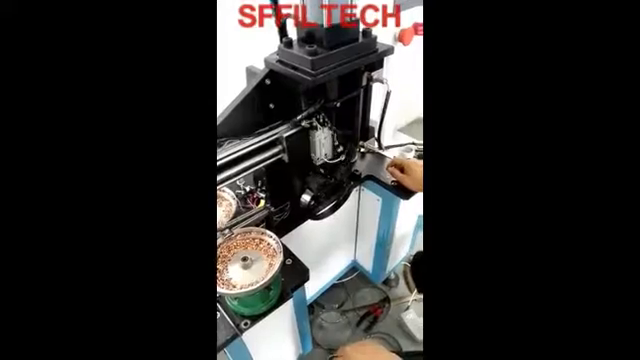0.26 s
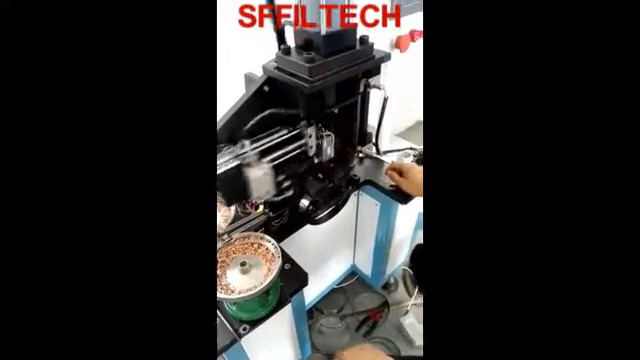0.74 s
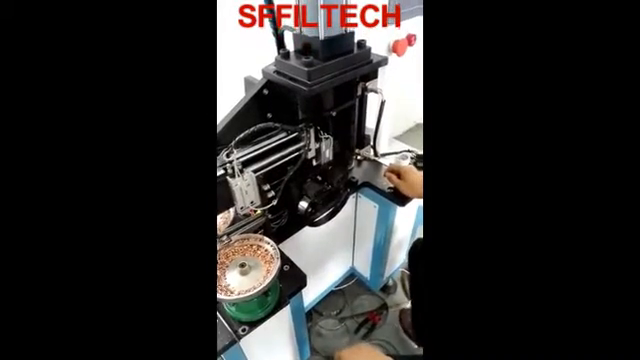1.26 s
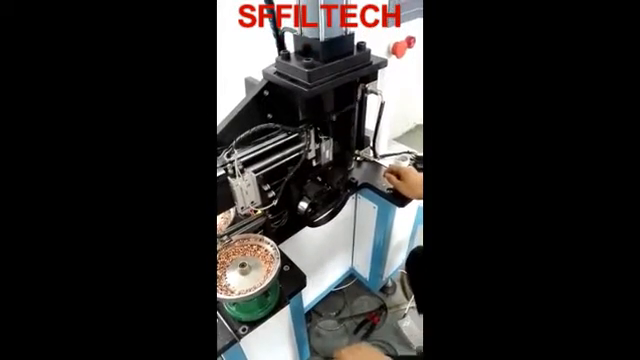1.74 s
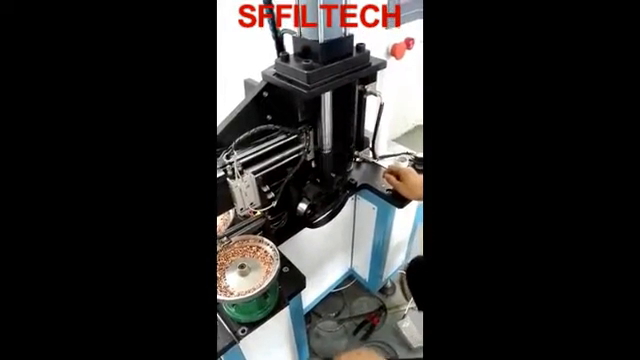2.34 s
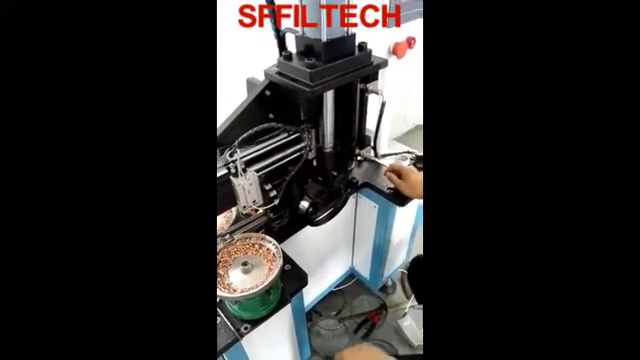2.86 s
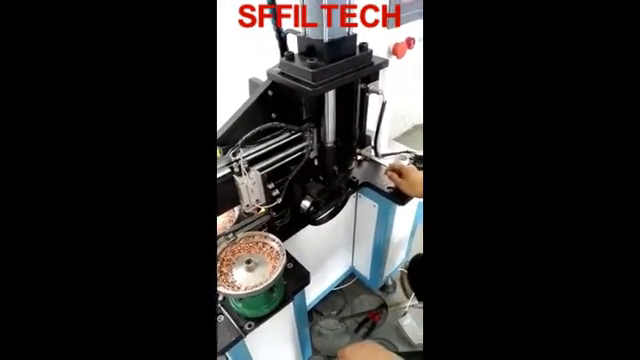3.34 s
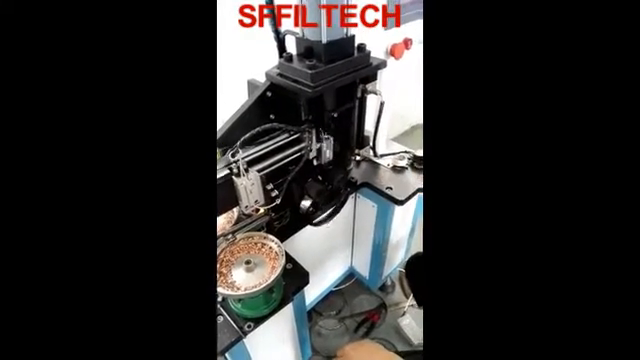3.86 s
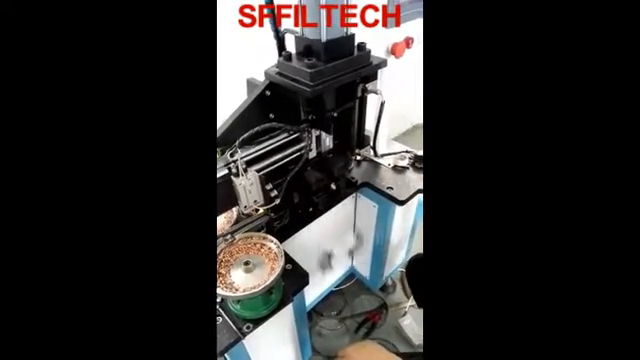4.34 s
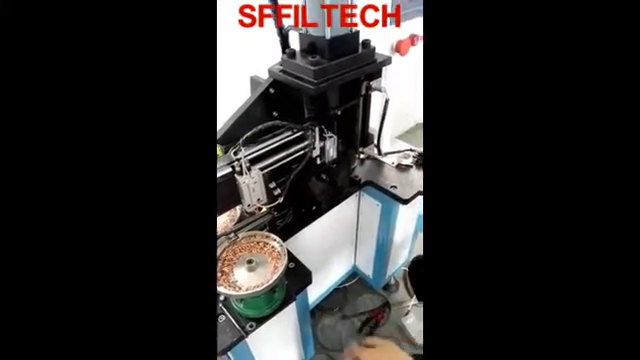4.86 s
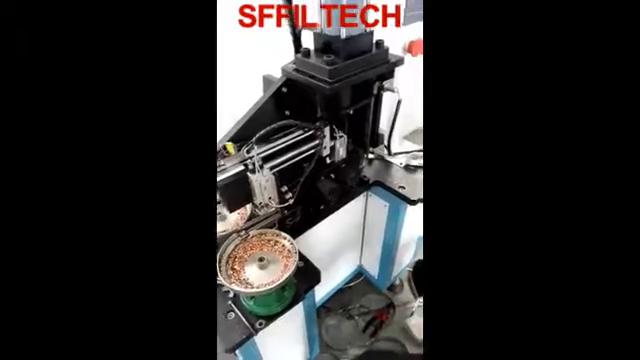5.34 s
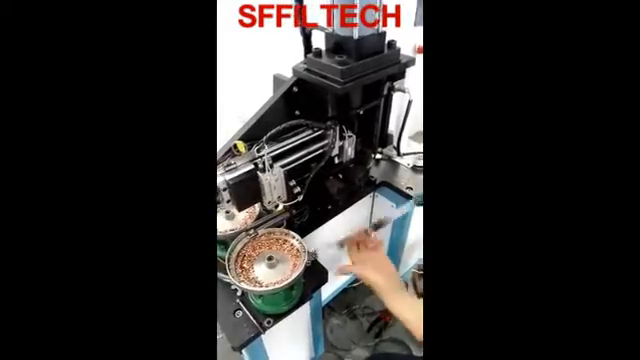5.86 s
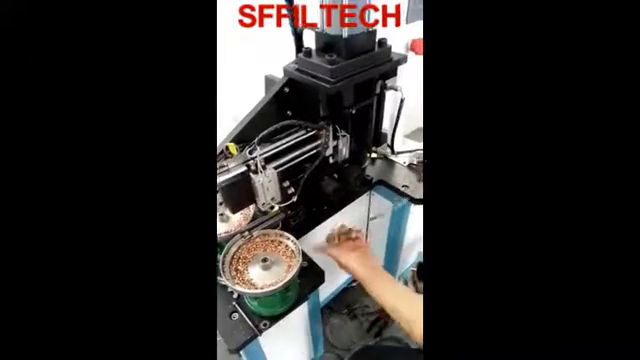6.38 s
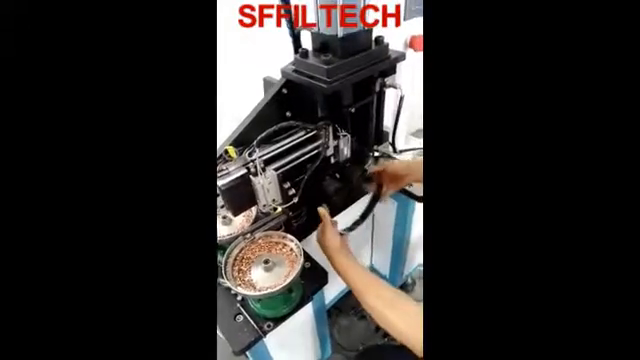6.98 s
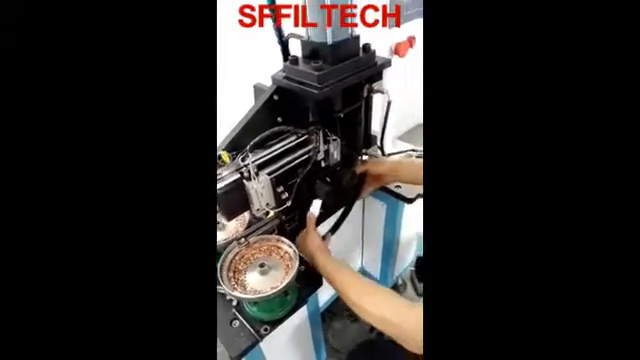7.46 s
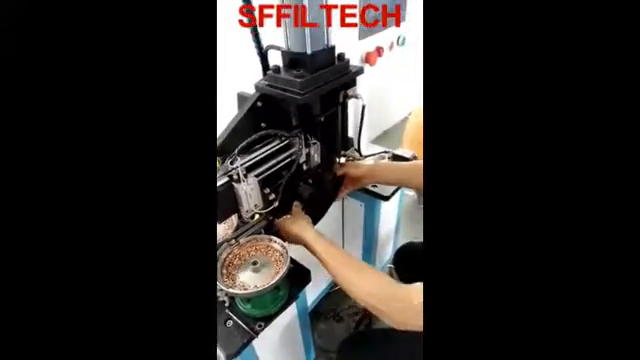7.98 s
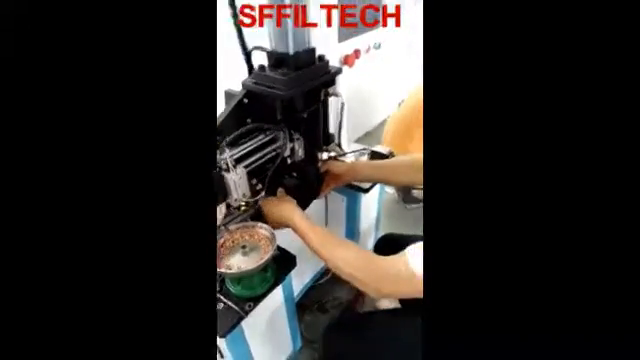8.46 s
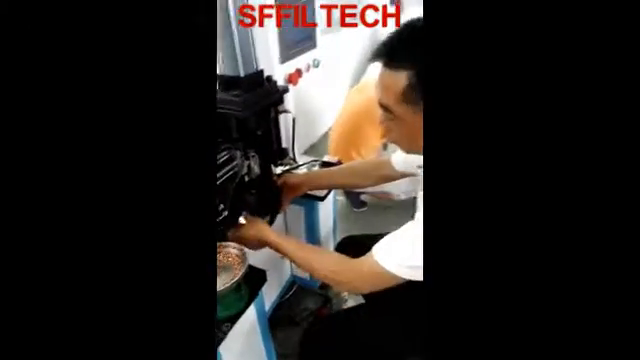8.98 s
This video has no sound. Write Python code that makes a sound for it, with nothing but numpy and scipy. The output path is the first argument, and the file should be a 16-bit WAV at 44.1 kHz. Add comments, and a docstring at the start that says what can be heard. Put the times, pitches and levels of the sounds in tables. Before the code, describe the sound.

In a hard-walled workshop, machines drone and hiss while a pneumatic press starts its cycle with a puff, a rubbing slide and steel clacks. Air hisses, then the ram lands with a sharp crack and a low boom. Two loud air blasts lead into a run of weaker ones, mixed with clinking parts and a faint feeder ring. A few more clacks and blasts follow. Heard close, from a handheld phone.

```python
"""A pneumatic press in a workshop

The press runs one cycle, heard from a phone held above it. A slide rubs along, air hisses as the ram
comes down, and the tool cracks onto the die and makes the frame boom. Then a valve lets out short
blasts of air and loose metal parts clink. Machines drone behind; hard walls give each blast a tail."""
import sys
import numpy as np
from scipy import signal
from scipy.fft import rfft, irfft
from scipy.io import wavfile

SR = 44100
rng = np.random.default_rng(int(sys.argv[2]) if len(sys.argv) > 2 else 0)


def generate_wav(sig):
    """Save sig (samples, or channels by samples) to the path in sys.argv[1] as 16-bit PCM at SR."""
    pcm = np.round(np.clip(np.atleast_2d(sig).T, -1, 1) * 32767).astype(np.int16)
    wavfile.write(sys.argv[1], SR, pcm)


N = 406602
TIME = np.arange(N) / SR
FREQ = np.arange(N // 2 + 1) * SR / N + 1e-3
MIC_GAP_M, SOUND_M_PER_S = 0.2, 343  # the phone has two microphones, left and right
MIC_LAG = round(MIC_GAP_M / SOUND_M_PER_S * SR)  # in samples


# Short blasts of air. Each row: start in seconds, level in dB, seconds the valve is open,
# extra hollow body in dB, extra high sizzle in dB.
AIR_BLASTS = [(3.318, -6, .015, 1, 2.5), (3.707, -8, 0.0059, -1, -.5), (4.086, -17.5, 0.027, 1, 2.5),
              (4.423, -18, 0.025, -0.5, 0), (4.705, -21, 0.021, 1.5, 7), (4.987, -19.5, 0.025, -3.5, -5),
              (5.253, -22, 0.026, 0, -0.5), (5.511, -21, 0.023, 0.5, -.5), (5.785, -21, 0.024, -1.5, -3.5),
              (6.053, -16, 0.019, -3, -4), (6.271, -19, 0.037, -8.5, 6), (6.312, -22, 0.038, -4, -6),
              (6.528, -22.5, 0.018, -2, -2.5), (7.477, -13, 0.025, 3.5, 0), (8.004, -15.5, .032, 4.5, -0.5)]
# The tone of the rushing air. Each row: frequency in Hz, level in dB.
JET_TONE = [(40, -29), (130, -18.5), (280, -11), (480, -11.5), (700, -16), (950, -1.5), (1250, -5.5),
            (1550, -1), (2300, 0), (3300, 0), (4400, 1.5), (7000, -3.5), (10500, -10.5), (14500, -14.5)]
# Hollows and plates that the air sets ringing. Each row: pitch in Hz, boost in dB.
CAVITY_RINGS = [(175, 5), (272, 5), (345, 1), (960, 3), (1535, 4), (1684, 4), (1915, 4), (2052, 4),
                (2533, 5), (2606, 3), (2881, 3), (2932, 3), (3731, 3), (3855, 3), (4268, 5), (4377, 6),
                (4831, 2), (5647, 4)]

def air_blasts(flutter_db=0.96, rise=0.0014, fade=0.027):
    """Each time the valve opens it spits, then a swirling jet of air rings the hollows of the machine."""
    rings = 1 + sum((undb(db) - 1) * resonance(hz, width=68) ** 2 for hz, db in CAVITY_RINGS)
    jet = rfft(noise(undb(curve(JET_TONE)) * rings) * undb(flutter_db * wobble(300)))
    # Split the jet into low body, a bark near 2 kHz, high sizzle and the rest.
    shares = [curve([(1000, 1), (1600, 0)]),
              curve([(1000, 0), (1600, 1), (2300, 1), (3400, 0)]),
              curve([(5500, 0), (10000, 1)])]
    body, bark, sizzle, rest = (irfft(jet * share, N) for share in shares + [1 - sum(shares)])
    out = np.zeros((2, N))
    for start, db, hold, hollow_db, sizzle_db in AIR_BLASTS:
        bark_db = 1.4 + 0.7 * hollow_db  # hollow blasts bark more
        air = puff(start, rise, hold, fade) * (undb(hollow_db) * body + undb(bark_db) * bark + rest)
        spit = puff(start, rise, hold, fade, surge=1.2, surge_s=0.006) * undb(sizzle_db) * sizzle
        out += pan(-0.11 * hollow_db) * undb(db) * (air + spit)  # and lie further right
    return out


# Air escaping from the cylinders. Each row: start in seconds, level in dB, seconds open,
# fade in seconds, extra sizzle in dB.
AIR_HISSES = [(0, -22.5, .05, 0.013, 4), (1.768, -24.5, 0.075, 0.059, 0.5), (1.93, -42, 0.54, .09, 10.5),
              (2.837, -34.5, 0.024, 0.033, -15), (4.935, -31.5, 0.093, 0.039, 12.5),
              (5.12, -44, 0.23, 0.056, 14.5), (7.094, -29.5, 0.025, 0.037, -7),
              (7.189, -26, 0.017, 0.059, -3.5), (8.730, -34.5, .008, 0.065, -13)]
# The tone of that hiss. Each row: frequency in Hz, level in dB.
HISS_TONE = [(100, -7.5), (1000, -4), (2100, 3.5), (3000, 0.5), (4200, 4.5), (7000, -2), (11000, -4),
             (14500, -7)]

def air_hisses(flutter_db=2.3):
    """Air squeezes through narrow openings and hisses for as long as a piston moves."""
    jet = rfft(noise(undb(curve(HISS_TONE))) * undb(flutter_db * wobble(60)))
    high_share = curve([(6000, 0), (10000, 1)])
    hiss, sizzle = irfft(jet * (1 - high_share), N), irfft(jet * high_share, N)
    return sum(undb(db) * puff(start, 0.0012, hold, fade) * (hiss + undb(sizzle_db) * sizzle)
               for start, db, hold, fade, sizzle_db in AIR_HISSES)


RAM_LANDS_S = 2.333
# How the die, the block under the tool, rings. Each row: pitch in Hz, width in Hz, level in dB.
DIE_RINGS = [(600, 900, -6.5), (1750, 560, 1.5), (2440, 430, -0.5), (4130, 520, -0.5), (5040, 2500, -3.5),
             (12100, 7100, -10)]

def ram_crack(level_db=-5, lead_s=0.0058):
    """The tool hits the die, which rings for a few milliseconds just before the frame swings."""
    loudness = burst(RAM_LANDS_S - lead_s, rise=0.00093, hold=0.0038, fade=0.0015)
    return undb(level_db) * loudness * ringing_noise(DIE_RINGS)


# The low notes of the frame. Each row: pitch in Hz, level in dB, fade in seconds.
FRAME_NOTES = [(121, -36.5, 0.15), (136, -33.5, 0.079), (166.6, -43, 0.13), (209, -39, 0.16)]

def ram_boom():
    """The landing ram sets the frame swinging; its low notes throb against each other as they fade."""
    return knocks([(RAM_LANDS_S, db, fade, hz) for hz, db, fade in FRAME_NOTES], rise=0.002, hold=0.0045)


# Steel hitting steel. Each row: start in seconds, level in dB, fade in seconds,
# added brightness in dB per octave above 1 kHz.
STEEL_HITS = [(.378, -31, .0087, 4), (.987, -21.5, 0.015, -4.5), (4.247, -25, .0074, 4.5),
              (4.969, -18, 0.0054, 0.5), (7.115, -15.5, 0.025, 2.5), (7.356, -32.5, .02, .5),
              (8.761, -31, .022, 1)]
# The tone of the steel. Each row: frequency in Hz, level in dB.
STEEL_TONE = [(100, -16), (500, -8), (1100, 8.5), (1800, 2), (2400, 6), (3500, 1), (4600, 4), (7000, -3.5),
              (11000, -12.5), (14500, -13)]

def steel_clacks(rise=0.00096, hold=0.0044):
    """Steel parts meet and ring briefly at so many pitches that they blur into noise."""
    steel_db = curve(STEEL_TONE)
    octaves = np.log2(np.maximum(FREQ / 1000, 1))
    return sum(undb(db) * burst(start, rise, hold, fade) * noise(undb(steel_db + bright_db * octaves))
               for start, db, fade, bright_db in STEEL_HITS)


# Loose parts dropping and bouncing. Each row: start in seconds, level in dB, fade in seconds.
PART_LANDINGS = [(4.307, -27, .012), (4.335, -31.5, 0.005), (5.421, -23.5, 0.009)]
# How such a part rings. Each row: pitch in Hz, width in Hz, level in dB.
PART_RINGS = [(1016, 280, 0.5), (1290, 97, -7), (1540, 200, -2), (2100, 150, -0.5), (3500, 4100, -14)]

def loose_parts(rise=0.00081, hold=0.008):
    """A light metal part chatters for a moment each time it lands."""
    chatter = ringing_noise(PART_RINGS)
    return chatter * sum(undb(db) * burst(start, rise, hold, fade) for start, db, fade in PART_LANDINGS)


# Heavy parts coming to a stop. Each row: start in seconds, level in dB, pitch in Hz.
HEAVY_STOPS = [(.052, -28, 88.5), (.372, -28.5, 90), (1.008, -30, 129), (1.763, -25.5, 76),
               (2.336, -29, 80.6), (4.855, -35, 104), (5.42, -41, 135), (7.355, -47, 109)]

def frame_thuds(stop_fade=0.0081, kick_lag_s=0.0133, kick_db=-32.5, kick_fade=0.0085, kick_hz=66):
    """The frame thuds when a heavy part stops, and just after each blast, in step with its strength."""
    stops = [(start, db, stop_fade, hz) for start, db, hz in HEAVY_STOPS]
    kicks = [(start + kick_lag_s, db + kick_db, kick_fade, kick_hz) for start, db, *_ in AIR_BLASTS]
    return knocks(stops + kicks, rise=0.0046, hold=0.0053)


# Two clicks before the ram moves. Each row: start in seconds, level in dB.
HOLLOW_CLICKS = [(1.445, -25), (1.733, -24.5)]

def hollow_clicks(hz=990, fade=0.0025):
    """The same small hollow part knocks twice."""
    return knocks([(start, db, fade, hz) for start, db in HOLLOW_CLICKS], rise=0.0025, hold=0.006)


# Slides rubbing and the table shuddering.
# Each row: pitch in Hz, width in Hz, level in dB, start in seconds, end in seconds.
SLIDE_RUBS = [(2200, 460, -43.5, .5, .97), (200, 260, -39, 0.975, 1.073), (940, 500, -40, 2.93, 3.15),
              (150, 270, -46.5, 4.2, 4.38)]

def slide_rubs():
    """Rubbing keeps the metal ringing while a slide moves."""
    return singing(SLIDE_RUBS, rise=0.0057, fade=0.036)


# Bowls that shake parts toward the press.
# Each row: pitch in Hz, width in Hz, level in dB, start in seconds, end in seconds.
FEEDER_BOWLS = [(2420, 140, -62, 2.8, 3.3), (2535, 230, -51.5, 4.9, 8.6)]
# The tone of the nearby machines. Each row: frequency in Hz, level in dB.
DRONE_TONE = [(25, -25), (60, -5.5), (300, -5.5), (450, -8.5), (940, 0.5), (2200, -3.5), (3200, -6.5),
              (3850, -7), (4300, -10.5), (7000, -22.5), (14000, -24)]
# The tone of the hall's steady hiss. Each row: frequency in Hz, level in dB.
HALL_TONE = [(30, -20), (65, -3.5), (250, -6), (600, -7), (950, 2.5), (1400, -0.5), (2500, 2), (4000, -2),
             (6500, -3), (11000, -8.5), (14500, -9.5)]

def workshop(drone_db=-31, sag_db_per_s=1.54, quiet_db=-47, hall_db=-39):
    """Machines drone, shaking bowls sing, and the hall hisses."""
    flicker = undb(0.8 * wobble(150) + 0.3 * wobble(12))
    # The drone sinks to a quieter level from 3.24 s over 1.36 s, likely the phone turning it down.
    sinking = np.clip((TIME - 3.24) / 1.36, 0, 1)
    loud_db = drone_db - sag_db_per_s * TIME
    drone = near_and_far(undb(curve(DRONE_TONE))) * undb((1 - sinking) * loud_db + sinking * quiet_db)
    hall = near_and_far(undb(curve(HALL_TONE))) * undb(hall_db)
    bowls = singing(FEEDER_BOWLS, rise=0.077, fade=0.22)
    turning_away = undb(-2.5 * np.maximum(TIME - 7.7, 0))  # all three fade as the phone turns at 7.7 s
    return flicker * turning_away * (drone + hall + bowls)


# How long the hall rings. Each row: frequency in Hz, seconds to fade by 60 dB.
ECHO_TIMES = [(100, 0.35), (500, 0.89), (2000, 0.6), (5000, 0.66), (9000, 0.62), (14000, 0.49)]

def hall_echo(sound, direct_db=-6, early_db=-1.5, late_db=-5.5, early_s=0.0063, pieces=14):
    """Sound arrives directly, bounces off the frame (early) and rings on in the hall (late)."""
    size = N // pieces
    age = TIME[:size]
    scatter, tail = all_around(1), rfft(all_around(1))
    centres = np.transpose(ECHO_TIMES)[0]
    bands = [irfft(tail * curve(np.column_stack([centres, one_band])), N)
             for one_band in np.eye(len(centres))]
    out = np.zeros((2, N + size))
    for start in range(0, pieces * size, size):  # the hand drifts, so each piece gets new echoes
        part = slice(start, start + size)
        early = scatter[:, part] * np.exp(-age / early_s)
        late = sum(band[:, part] * undb(-60 * age / ring_s)
                   for band, (_, ring_s) in zip(bands, ECHO_TIMES))
        late *= 1 - np.exp(-age / 0.0081)  # the tail takes a moment to build
        response = sum(undb(db) * echo / np.linalg.norm(echo, axis=1, keepdims=True)
                       for echo, db in ((early, early_db), (late, late_db)))
        response[0, MIC_LAG] += undb(direct_db)
        response[1, 0] += undb(direct_db)
        out[:, start:start + 2 * size - 1] += signal.fftconvolve(sound[:, part], response, axes=1)
    return out[:, :N]


def undb(db):
    """Turn decibels into a number to multiply by."""
    return 10 ** (np.asarray(db) / 20)


def curve(points):
    """Join (Hz, value) points with lines, giving every octave the same room."""
    hz, value = np.transpose(points)
    return np.interp(np.log(FREQ), np.log(hz), value)


def resonance(hz, width):
    """How strongly a ringing thing answers each frequency: 1 at its own pitch."""
    return 1 / np.sqrt(1 + ((FREQ ** 2 - hz ** 2) / (FREQ * width)) ** 2)


def noise(tone):
    """Noise of strength 1, shaped by a gain for each frequency."""
    shaped = irfft(rfft(rng.standard_normal(N)) * tone, N)
    return shaped / shaped.std()


def ringing_noise(rings):
    """Noise gathered around the pitches at which a part rings."""
    return noise(sum(undb(db) * resonance(hz, width) ** 2 for hz, width, db in rings))


def all_around(tone):
    """Noise from all sides: left and right are alike in the bass and unrelated in the treble."""
    alike = 0.97 * np.sinc(2 * FREQ * MIC_GAP_M / SOUND_M_PER_S)
    mid, side = (rfft(rng.standard_normal(N)) * tone * np.sqrt(1 + sign * alike) for sign in (1, -1))
    stereo = irfft(np.array([mid + side, mid - side]), N)
    return stereo / stereo.std()


def near_and_far(tone, direct_db=-4):
    """Noise that comes partly straight from the machines and partly from all sides."""
    return (all_around(tone) + undb(direct_db) * from_right(noise(tone))) / np.hypot(1, undb(direct_db))


def from_right(sound):
    """Direct sound reaches the right microphone first."""
    return np.array([np.pad(sound, (MIC_LAG, 0))[:N], sound])


def pan(db):
    """Left and right gains; positive dB leans left."""
    return undb(np.array([[db], [-db]]) / 2)


def wobble(rate):
    """Glide to a new random value `rate` times a second."""
    steps = rng.standard_normal(int(N / SR * rate) + 2)
    return np.interp(TIME * rate, np.arange(len(steps)), steps)


def span(start, hold, fade):
    """The samples during which an event is heard."""
    return slice(*np.searchsorted(TIME, [start, start + hold + 10 * fade]))


def burst(start, rise, hold, fade):
    """A loudness shape that builds, holds and dies away; all times are in seconds."""
    out, part = np.zeros(N), span(start, hold, fade)
    age = TIME[part] - start
    out[part] = (1 - np.exp(-age / rise)) * np.exp(-np.maximum(age - hold, 0) / fade)
    return out


def puff(start, rise, hold, fade, surge=0.45, surge_s=0.021):
    """A burst with a strong start: air trapped behind the valve rushes out first."""
    out, part = burst(start, rise, hold, fade), span(start, hold, fade)
    out[part] *= 1 + surge * np.exp(-(TIME[part] - start) / surge_s)
    return out


def knocks(blows, rise, hold):
    """Each blow rings one note that dies away."""
    out = np.zeros(N)
    for start, db, fade, hz in blows:
        part = span(start, hold, fade)
        note = np.sqrt(2) * np.sin(2 * np.pi * hz * (TIME[part] - start))
        out[part] += undb(db) * burst(start, rise, hold, fade)[part] * note
    return out


def singing(rows, rise, fade):
    """Bands of noise: metal kept ringing by steady shaking or rubbing."""
    return sum(all_around(resonance(hz, width) ** 2) * undb(db) * burst(start, rise, end - start, fade)
               for hz, width, db, start, end in rows)


def scene():
    """Air and metal echo in the hall; thuds, clicks, the boom and part of the crack arrive echo-free."""
    crack = ram_crack()
    press = air_blasts() + air_hisses() + steel_clacks() + loose_parts() + undb(-2) * crack
    direct_crack = undb(-11.5) * from_right(crack)  # the die faces the phone
    close = direct_crack + frame_thuds() + hollow_clicks() + ram_boom()
    return hall_echo(press) + close + slide_rubs() + workshop()


# How wide the phone makes the sound. Each row: frequency in Hz, boost of the left-right difference in dB.
STEREO_WIDTH = [(250, -4.5), (430, 4), (650, 8.5), (800, 2.5), (1000, -3.5), (1300, -3), (1800, 0.5)]
# The right microphone is mostly the more sensitive. Each row: frequency in Hz, left minus right in dB.
MIC_BALANCE = [(250, -0.2), (650, -2.5), (1100, -1), (1750, -4), (3400, 1), (4700, -3.5), (11000, -0.4)]

def record(dry, top_hz=14350):
    """The phone widens the low mids, drops a band of treble, flattens overloud peaks and cuts the top."""
    notch_db = curve([(7300, 0), (7700, -9), (8050, -38), (9100, -38), (9500, -9), (9900, 0)])
    left, right = rfft(dry)
    mid = (left + right) / 2
    side = (left - right) / 2 * undb(curve(STEREO_WIDTH))
    lean = undb(curve(MIC_BALANCE) / 2)
    spectrum = np.array([(mid + side) * lean, (mid - side) / lean]) * undb(notch_db)
    limited = np.clip(irfft(spectrum, N), -1, 1)
    return signal.sosfilt(signal.ellip(10, 0.2, 60, top_hz, fs=SR, output="sos"), limited)


dry = scene()
out = record(dry)
generate_wav(out)
```